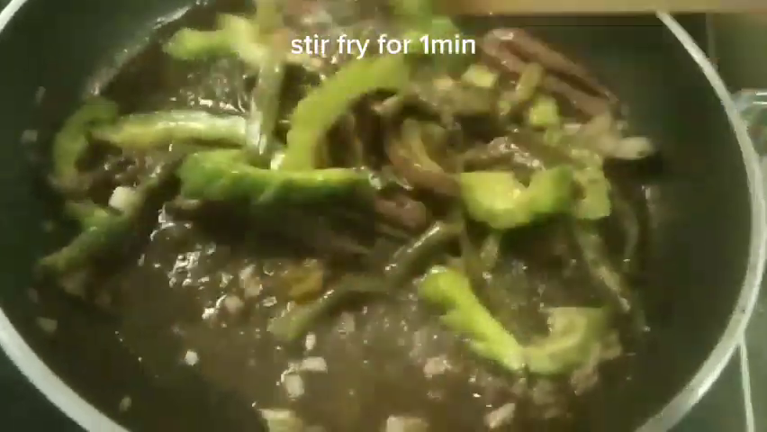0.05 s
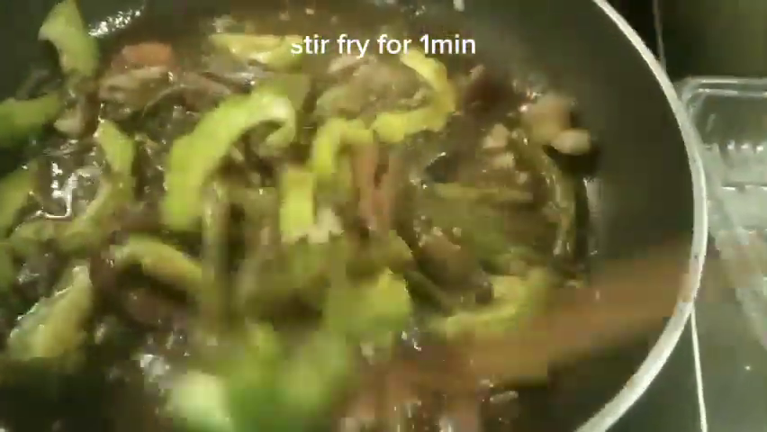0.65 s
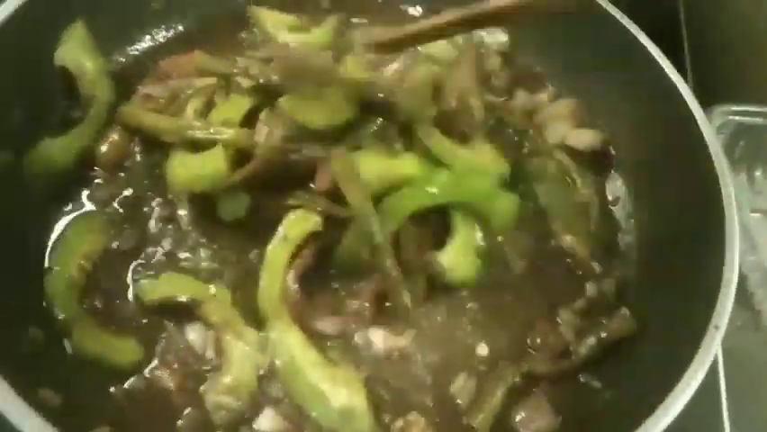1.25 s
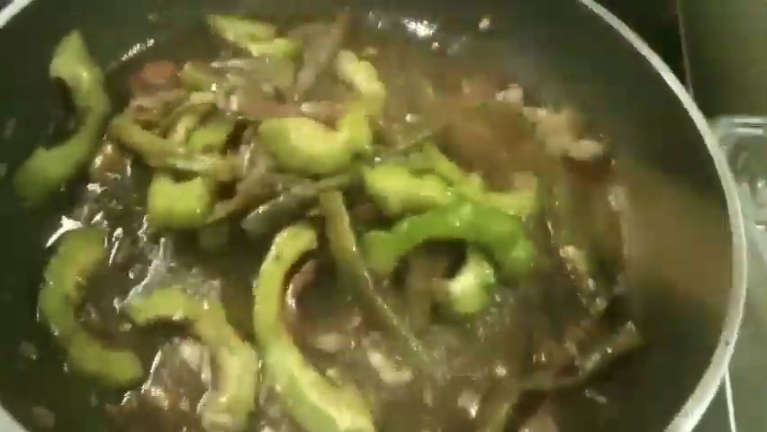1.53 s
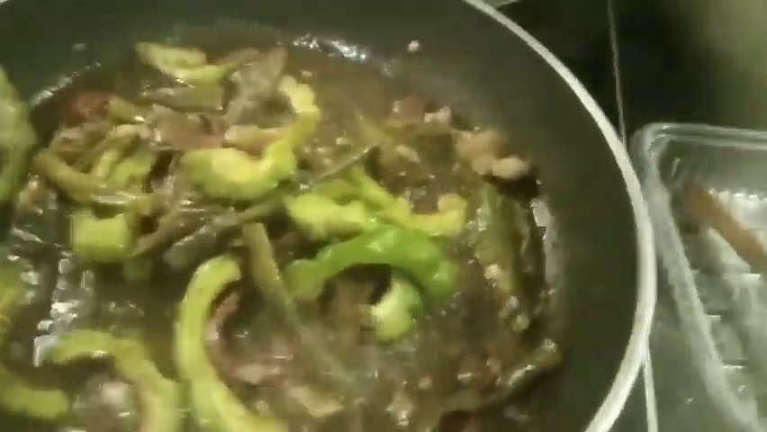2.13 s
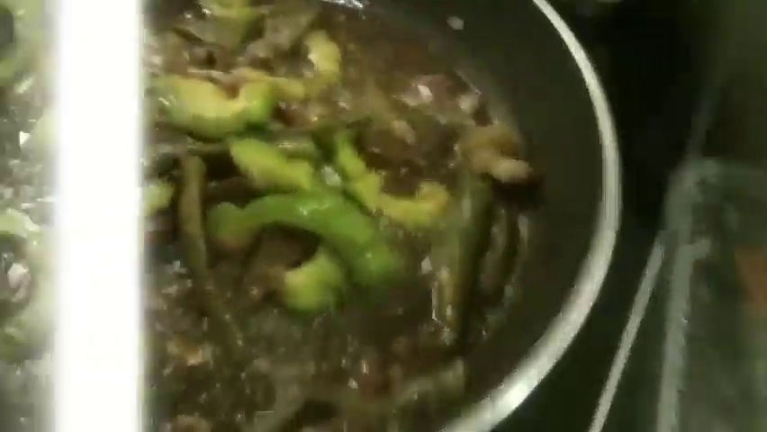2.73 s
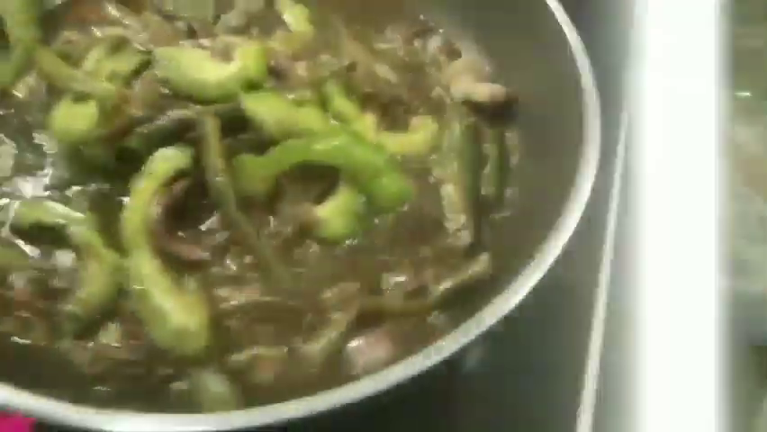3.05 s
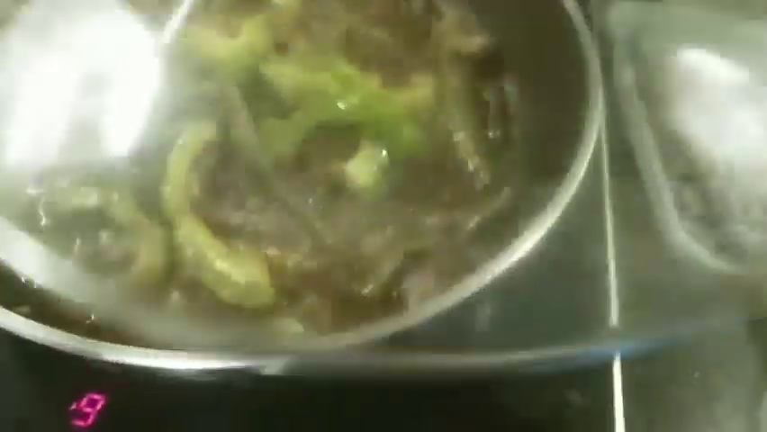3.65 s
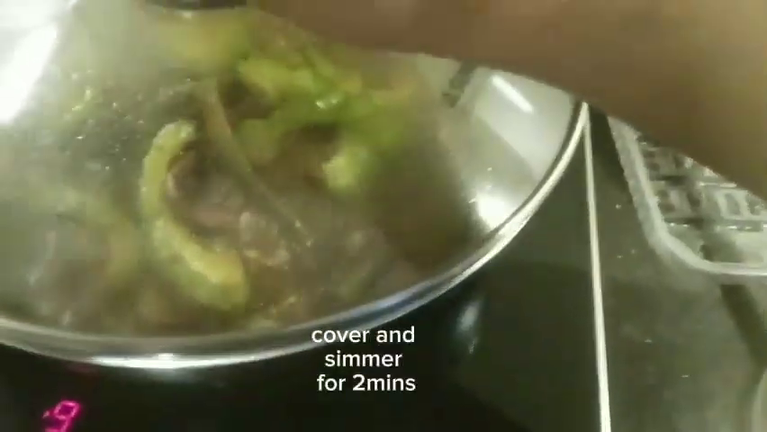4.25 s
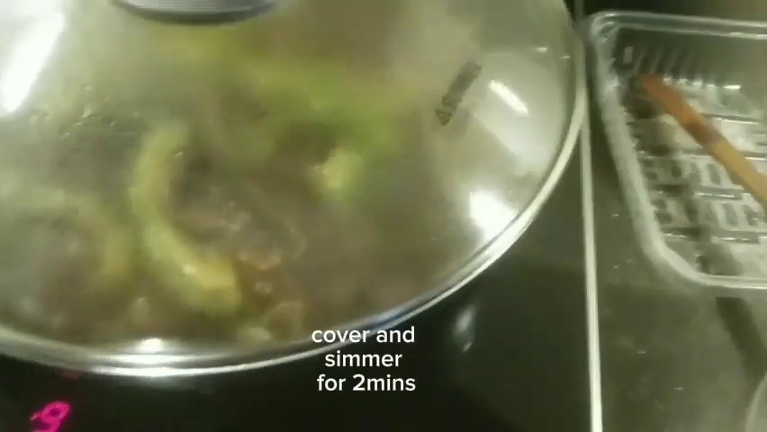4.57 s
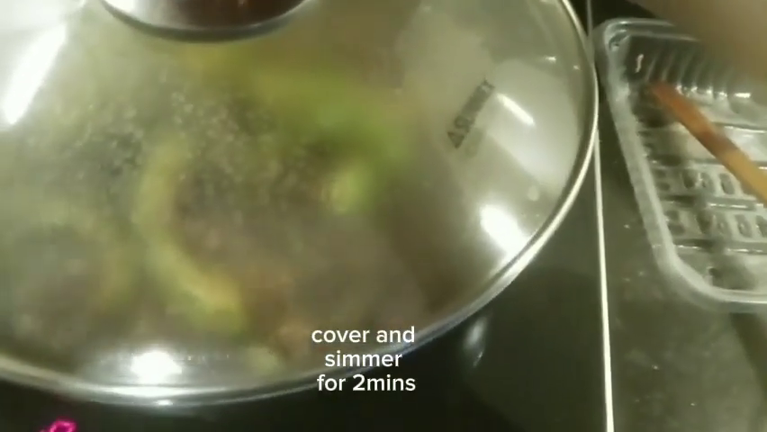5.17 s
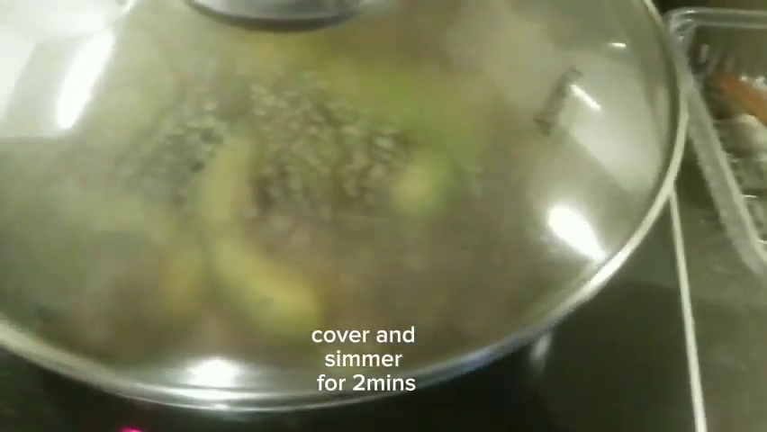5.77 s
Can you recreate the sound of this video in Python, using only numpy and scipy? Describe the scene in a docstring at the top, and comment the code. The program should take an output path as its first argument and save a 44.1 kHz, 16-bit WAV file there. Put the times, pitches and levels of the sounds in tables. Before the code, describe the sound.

Vegetables sizzle brightly in bubbling sauce, close to the microphone in a small kitchen with a low fan drone. A wooden spatula stirs softly and knocks on the pan a few times. The sizzle grows louder, with sharp spits of oil. A glass lid bumps as it is lifted, then clanks onto the rim and rings briefly. A dull thud shakes the worktop, and the sauce simmers on, quiet and muffled.

```python
"""A bright sizzle over a low fan drone: vegetables fry in sauce on an electric hob in a small kitchen.
Water flashes to steam, bubbles burst and oil spits; a wooden spatula stirs, taps the pan and is laid
aside. A hand rubs near the microphone as it moves to the hob's edge. A glass lid is picked up, clanks
onto the rim and shuts the sizzle in; a dull thud rings the worktop and the sauce simmers on."""
import sys
import numpy as np
from scipy import signal
from scipy.fft import rfft, irfft, next_fast_len
from scipy.io import wavfile
from scipy.ndimage import uniform_filter1d, map_coordinates

SR = 44100
rng = np.random.default_rng(int(sys.argv[2]) if len(sys.argv) > 2 else 0)


def to_wav(s):
    """Save 16-bit WAV."""
    ch = np.atleast_2d(s).T  # columns
    pcm = np.round(np.clip(ch, -1, 1) * 32767)  # PCM
    wavfile.write(sys.argv[1], SR, pcm.astype(np.int16))


N = 264819
T = np.arange(N) / SR

# how hard the open pan fries: time_s, level_db
VIGOUR = [(0.0, -50), (0.29, -48), (1.64, -49), (2.08, -46.5), (2.53, -41.5), (3.13, -41), (3.67, -44),
          (3.77, -46)]


def from_db(db):
    """Decibels to gain."""
    return 10 ** (np.asarray(db) / 20)


def rms_one(x):
    """Scale to rms 1."""
    return x / np.sqrt(np.mean(x ** 2) + 1e-20)


def steady(x, size):
    """Even out the level of a noise over a window of size samples; rms about 1."""
    return x / np.sqrt(uniform_filter1d(x ** 2, size=size) + 1e-12)


def in_time(rows):
    """Read a breakpoint curve at every sample."""
    return np.interp(T, *np.transpose(rows))


def at_hz(points, hz):
    """Read a table on a log-frequency axis."""
    table_hz, value = np.transpose(points)
    return np.interp(np.log(hz + 1), np.log(table_hz), value)


def add(out, start_s, x):
    """Mix x into out from start_s on."""
    at = int(start_s * SR)
    out[at:at + len(x)] += x[:N - at]


def colour(x, spectrum):
    """Minimum-phase EQ of unit power gain, falling steeply beyond the table's ends."""
    size = 2 * next_fast_len(N // 2 + SR // 4)
    hz = np.arange(size // 2 + 1) * SR / size
    octaves_outside = np.abs(np.log2((hz + 1) / np.clip(hz + 1, spectrum[0][0], spectrum[-1][0])))
    gain = rms_one(from_db(at_hz(spectrum, hz) - 30 * np.minimum(octaves_outside, 2)))
    cepstrum = irfft(np.log(gain))
    cepstrum[1:size // 2] *= 2  # folding the cepstrum makes the filter causal
    cepstrum[size // 2 + 1:] = 0
    return irfft(rfft(x, size) * np.exp(rfft(cepstrum)))[:N]


def low_pass(x, hz):
    """Gentle one-pole low-pass."""
    return signal.lfilter(*signal.butter(1, hz, fs=SR), x)


def even_spectrum(x):
    """Smooth out the chance peaks and holes in the spectrum of a short burst."""
    spectrum = rfft(x)
    power = np.abs(uniform_filter1d(np.abs(spectrum) ** 2, size=24))
    return irfft(spectrum / np.sqrt(power + 1e-12), len(x))


def ring(clicks, hz, t60):
    """A resonator: a unit click sets a sine of height 1 ringing."""
    radius, angle = from_db(-60 / (t60 * SR)), 2 * np.pi * hz / SR
    return signal.lfilter([0, np.sin(angle)], [1, -2 * radius * np.cos(angle), radius ** 2], clicks + 1e-18)


def grains(per_s, spread_db):
    """Random clicks whose levels scatter by spread_db; rms 1."""
    sizes = from_db(spread_db * np.minimum(rng.exponential(1, N), 6))
    return rms_one((rng.random(N) < per_s / SR) * sizes * rng.choice([-1, 1], N))


def flicker(x, depth_db, patch_s, patch_hz, rise_hz_per_s=0):
    """Patches of the spectrum swell and fade at random and may glide upwards; rms 1."""
    hz, s, cells = signal.stft(x, SR, nperseg=1024)
    field = rng.standard_normal(size=(600, 300))
    hz, s = np.meshgrid(hz, s, indexing="ij")
    position = [(hz - rise_hz_per_s * s) / patch_hz, s / patch_s]
    swell = map_coordinates(field, position, order=2, mode="wrap")
    cells = cells * from_db(depth_db * np.tanh(swell - .5))
    return rms_one(signal.istft(cells, SR)[1][:N])


def strokes(rows, attack_s, release_s):
    """Pressure envelope of a series of strokes: each swells to its peak and dies away."""
    pressure = np.zeros(N)
    for peak_s, db in rows:
        before, after = np.minimum(T - peak_s, 0), np.maximum(T - peak_s, 0)
        pressure += from_db(db) * np.exp(-(before / attack_s) ** 2 - after / release_s)
    return pressure


def nearness(start_s=2.33, end_s=2.87):
    """How far the microphone has moved to the hob's edge, 0-1."""
    return np.clip((T - start_s) / (end_s - start_s), 0, 1)


def kitchen(x, wet_db):
    """Direct sound plus a small room's diffuse tail, each band dying at its own rate."""
    # reverb time: freq_hz, t60_s
    room_decay = [(100, 0.23), (500, 0.32), (2000, 0.37), (6000, 0.4), (14000, 0.26)]
    t, tail = T[:SR * 2 // 3], 0
    edges_hz = np.geomspace(50, 16000, 9)
    for low, high in zip(edges_hz, edges_hz[1:]):
        band_pass = signal.butter(2, [low, high], "band", fs=SR, output="sos")
        band = signal.sosfilt(band_pass, rng.standard_normal(len(t)))
        tail = tail + band * from_db(-60 * t / at_hz(room_decay, np.sqrt(low * high)))
    tail = tail * (1 - np.exp(-t / 0.0024))  # reflections build up
    return x + from_db(wet_db) * signal.fftconvolve(x, tail / np.linalg.norm(tail))[:N]


def sizzle():
    """Water flashes to steam in thousands of tiny bursts; larger drops ring in the pan's hollow."""
    # bright steam hiss: freq_hz, gain_db
    steam_eq = [(2940, -51), (5000, -19), (6290, -3), (7380, 3), (7860, 4.5), (8840, -3.5), (11900, -16),
                (14100, -27), (16000, -63)]
    # resonances of the pan's hollow: pitch_hz, level_db, t60_s
    hollow_modes = [(2580, -2, 0.022), (2927, 5.5, 0.056), (3240, -12, 0.035), (3700, -8.5, 0.015),
                    (4680, 7, 0.027), (5110, 9.5, 0.012), (5700, 11.5, 0.012), (5900, 4, 0.024),
                    (6300, 6, 0.023)]
    bursts = colour(grains(per_s=20000, spread_db=3.5), steam_eq)
    bursts = signal.sosfilt(signal.butter(2, 5200, "high", fs=SR, output="sos"), bursts)
    hiss = flicker(bursts, depth_db=3.5, patch_s=.035, patch_hz=136)
    crackle = sum(from_db(db) * rms_one(ring(grains(per_s=5100, spread_db=4), hz, t60))
                  for hz, db, t60 in hollow_modes)
    crackle = flicker(crackle, depth_db=9, patch_s=.028, patch_hz=150)
    return from_db(in_time(VIGOUR)) * (from_db(-0.5) * hiss + from_db(-12.5) * crackle)


def bubble(hz, swell_s, rise_per_s=0.58):
    """A tone that swells, rings and dies, climbing in pitch like a bubble nearing the surface."""
    t = T[:int(7 * swell_s * SR)]
    envelope = t / swell_s * np.exp(1 - t / swell_s)
    return envelope * np.sin(2 * np.pi * hz * (t + rise_per_s * t ** 2 / 2))


def bubbling(count, low_hz, high_hz, swell_s, spread_db):
    """Bubbles at random moments and pitches, many quiet and a few loud; rms 1."""
    out = np.zeros(N)
    for when, pitch, size, life in rng.random((count, 4)):
        pop = bubble(low_hz + (high_hz - low_hz) * pitch, swell_s * (.5 + life))
        add(out, when * T[-1], from_db(spread_db * size ** 2) * pop)
    return rms_one(out)


def boiling_sauce():
    """In the open pan the sauce boils in a dense wet crackle that follows the frying."""
    # the boil from above the pan: freq_hz, gain_db
    above_eq = [(280, -70), (480, -18.5), (616, -7.5), (707, -24.5), (800, -6), (900, 1), (968, -6.5),
                (1080, -29.5), (1200, -8.5), (1280, -17.5), (1390, -2.5), (1510, -6), (1680, -21),
                (1900, -11.5), (2180, -14), (2600, -21), (3300, -20), (4290, -27), (7260, -120)]
    # the boil from the hob's edge: freq_hz, gain_db
    edge_eq = [(280, -33), (470, -19), (595, 2), (690, -21), (860, 3), (1040, -27), (1210, -1.5),
               (1420, -4), (1720, -17), (1920, -6), (2100, -14), (2270, -10), (2750, -24), (3200, -13),
               (3600, -26), (4290, -27), (7260, -120)]
    bubbles = bubbling(count=6000, low_hz=503.4, high_hz=4260, swell_s=0.004, spread_db=8.5)
    ticks = from_db(3) * grains(per_s=2000, spread_db=1)
    boil = flicker(bubbles + ticks, depth_db=6.5, patch_s=.032, patch_hz=130)
    above = np.sqrt(1 - nearness()) * rms_one(colour(boil, above_eq))
    edge = np.sqrt(nearness()) * rms_one(colour(boil, edge_eq))
    vigour_db = in_time(VIGOUR)
    level_db = -52 + 0.33 * (vigour_db - vigour_db.mean())  # a third of the sizzle's swing
    return from_db(level_db) * (above + edge)


def fan():
    """Moving air drones in low, wavering resonances, deeper at the hob's edge."""
    # the drone from above the pan: freq_hz, gain_db
    above_eq = [(18, -76), (30, -20), (77, -10), (97, -11), (129, 8), (192, -18.5), (266, -7.5), (376, -22),
                (432, -27), (480, -37), (620, -55), (1060, -120)]
    # the drone from the hob's edge: freq_hz, gain_db
    edge_eq = [(30, -5), (43, -24), (62, -15), (83, -4), (107, 2.5), (128, 0.5), (161, -17), (199, -25.5),
               (269, -11.5), (368, -29.5), (480, -35), (620, -87)]
    air = flicker(rng.standard_normal(N), depth_db=8, patch_s=.05, patch_hz=82)
    above = from_db(-51.5) * steady(colour(air, above_eq), size=SR // 10)
    edge = from_db(-47) * steady(colour(air, edge_eq), size=SR // 8)
    near = nearness()
    return (1 - near) * above + near * edge


def room_tone():
    """The faint, steady hiss of the kitchen."""
    # tone of the hiss: freq_hz, gain_db
    hiss_eq = [(240, 2), (400, -16), (507, -25), (770, 20), (977, 1.5), (1440, 5), (2500, -21), (3600, -10),
               (5500, -16), (7170, -17), (14000, -20)]
    return from_db(-66.5) * colour(rng.standard_normal(N), hiss_eq)


def blips_and_hoot(roughness=0.48):
    """Large bubbles burble in the sauce; a soft hollow hoot comes as the lid is carried over the pan."""
    # bubble blips and, at 3.455 s, the lid's hoot: start_s, level_db, pitch_hz, swell_s
    soft_tones = [(0.064, -45.5, 297, 0.0089), (0.328, -49.5, 317, .009), (3.455, -45, 591, 0.031),
                  (4.622, -54, 1360, 0.0063), (4.676, -56, 1650, 0.014), (4.868, -45, 2070, 0.0058),
                  (4.901, -48, 1622, 0.0074), (5.04, -50, 2030, .008), (5.196, -42.5, 256, 0.013),
                  (5.298, -52, 1785, 0.016), (5.355, -49, 2214, 0.011), (5.468, -52, 1690, 0.006),
                  (5.48, -43.5, 290, 0.0099), (5.594, -43, 273, 0.013), (5.625, -45, 1285, 0.0087),
                  (5.801, -39.5, 273, .013), (5.82, -52, 2840, 0.0085)]
    out = np.zeros(N)
    for start_s, db, hz, swell_s in soft_tones:
        add(out, start_s, from_db(db) * bubble(hz, swell_s))
    slow_noise = low_pass(low_pass(rng.standard_normal(N), hz=59), hz=59)
    flutter = np.sqrt(1 - roughness) + np.sqrt(roughness) * steady(slow_noise, size=SR // 25)
    return kitchen(out * flutter, wet_db=-7.5)


def stirring():
    """Pieces of food tumble softly against the pan at each shove of the spatula."""
    # shoves across the pan: peak_s, level_db
    shoves = [(0.115, -42), (0.48, -50), (0.745, -39.5), (1.13, -45), (1.31, -54), (1.485, -44)]
    # soft, low push on the pan: freq_hz, gain_db
    shove_eq = [(70, -12), (135, 12), (190, -22), (270, -8.5), (380, -32), (600, -38)]
    tumble = steady(colour(grains(per_s=820, spread_db=2), shove_eq), size=SR // 30)
    return strokes(shoves, attack_s=0.024, release_s=0.067) * tumble


def spits(decay_s=0.0051):
    """Single drops burst in the hot oil with a brief fizz."""
    # bursting drops: start_s, level_db
    drops = [(0.14, -29.5), (0.552, -27.5), (0.7233, -34), (1.356, -36), (2.2092, -30), (2.4157, -22),
             (2.662, -22), (2.814, -41), (3.4997, -24.5), (3.6227, -27)]
    # sharp fizz: freq_hz, gain_db
    fizz_eq = [(1200, -26), (3000, -23), (8000, -3), (12000, -15), (15000, -39)]
    fizz, t = np.zeros(N), T[:SR // 25]
    for start_s, db in drops:
        burst = rng.standard_normal(len(t)) * np.exp(-t / decay_s)
        add(fizz, start_s + 0.0025, from_db(db - 12.5) * burst)
    return kitchen(colour(fizz, fizz_eq), wet_db=-11.5)


def contacts(hits, scrape, slide_s=0.063):
    """Force of each hit: a click plus a burst of micro-slips that grows with the contact time."""
    out, t = np.zeros(N), T[:SR // 6]
    for start_s, db, bass_db, treble_db, contact_s, *_ in hits:
        envelope = np.exp(-t / contact_s) * (t / contact_s) ** (contact_s / 0.011)
        slips = even_spectrum(rng.standard_normal(len(t)) * envelope)
        slips *= np.exp(-(t / slide_s) ** 4)  # the slide comes to rest
        force = scrape * contact_s / 0.0025 * slips / np.linalg.norm(slips)
        force[0] += 1  # the click
        force /= np.linalg.norm(force)
        force += (from_db(bass_db) - 1) * low_pass(force, hz=250)  # weight
        force += (from_db(treble_db) - 1) * (force - low_pass(force, hz=4600))  # hardness
        add(out, start_s, from_db(db) * force)
    return out


def spatula_taps():
    """Wood knocks on the pan: a dense, quickly damped body and a few lasting modes."""
    # taps on pan and tray: start_s, level_db, bass_db, treble_db, contact_s
    taps = [(1.222, -38, 4, 2.5, 0.012), (1.653, -27, 5.5, -5, 0.0096), (1.703, -46, 12, 12.5, 0.0052),
            (1.722, -30, 11.5, -22, 0.013), (1.7375, -29, 12.5, -11, 0.002), (1.99, -41, 5, -17, 0.013),
            (2.078, -41.5, -28, 16, 0.014)]
    # woody body of a tap: freq_hz, gain_db
    body_eq = [(120, -28), (200, -24), (453, 4), (772, -24.5), (900, -10), (1060, -19), (1400, 4),
               (1750, -10), (2180, 0.5), (2450, -3), (2800, 3), (3200, -10.5), (3600, -9.5), (5100, -8.5),
               (5650, -6), (8210, -6.5), (14000, -38)]
    # ring of the pan: pitch_hz, level_db, t60_s
    pan_modes = [(407, 0, 0.1), (570, 7.5, 0.024), (1405, 5, 0.1), (2820, 7.5, 0.085), (3590, -1.5, 0.045),
                 (5350, 3, 0.045)]
    force = contacts(taps, scrape=2.7)
    ringing = sum((-1) ** k * from_db(db) * ring(force, hz, t60)
                  for k, (hz, db, t60) in enumerate(pan_modes))
    return from_db(26.5) * colour(force, body_eq) + from_db(-11) * ringing


def waver(rumble, half_width_s=0.069):
    """The low rumble wavers, briefly louder here and there."""
    # louder moments: peak_s, boost_db
    lifts = [(2.26, 8), (3.06, 6), (4.22, 9), (4.83, 4.5), (4.98, 4), (5.43, 3.5), (5.699, 7.5),
             (5.99, 3.5)]
    return rumble * from_db(sum(db * np.exp(-((T - peak_s) / half_width_s) ** 2) for peak_s, db in lifts))


def hand_rub():
    """Skin slips in fine grains on the casing beside the microphone."""
    # strokes of the hand: peak_s, level_db
    rubs = [(2.44, -41), (2.72, -58), (3.08, -52)]
    # tone of the rubbed casing: freq_hz, gain_db
    casing_eq = [(120, -26), (200, -15), (269, -1), (400, -16), (490, -22), (571, -9), (666, -11),
                 (908, -10), (1010, -16), (1250, -3), (1580, -12.5), (1780, -23), (1970, -24), (2800, -31),
                 (3640, -52), (6160, -120)]
    slips = colour(grains(per_s=3900, spread_db=-1), casing_eq)
    friction = flicker(slips, depth_db=7, patch_s=0.061, patch_hz=89.3)
    return strokes(rubs, attack_s=0.14, release_s=0.19) * friction


def clunks(hits, clunk_cycles=0.96, boom_hz=93.3, boom_cycles=0.81):
    """At each blow the struck thing flexes for a few cycles and its support gives with a low boom."""
    out, t = np.zeros(N), T[:SR // 6]
    for start_s, *_, clunk_db, clunk_hz, boom_db in hits:
        for db, hz, cycles in (clunk_db, clunk_hz, clunk_cycles), (boom_db, boom_hz, boom_cycles):
            age = t * hz / cycles  # 1 at the widest swing
            add(out, start_s, from_db(db) * age * np.exp(1 - age) * np.sin(2 * np.pi * hz * t))
    return out


def lid_pickup():
    """The glass lid bumps on its stand, damped by the hand that lifts it."""
    # bumps: start_s, level_db, bass_db, treble_db, contact_s, clunk_db, clunk_hz, boom_db
    bumps = [(3.213, -38.5, -9, -7, 0.0053, -50, 500, -57), (3.2255, -25.5, -14, 8, 0.0067, -21, 597, -50),
             (3.2485, -21.5, -5.5, 4, 0.0038, -18, 580, -45),
             (3.2975, -19.5, -19, -1, 0.0046, -22, 297, -54)]
    # hand-damped glass: freq_hz, gain_db
    held_eq = [(59, -35), (100, 8), (168, -0.5), (254, -4), (293, 1.5), (568, -4), (933, -9.5), (1100, -4),
               (1300, -10.5), (1730, -15), (2570, -18.5), (2970, -13.5), (4400, -26), (7850, -16.5),
               (14000, -53)]
    body = from_db(22.5) * colour(contacts(bumps, scrape=0.82), held_eq)
    return kitchen(body + clunks(bumps), wet_db=-13)


def lid_wobbles(sag_per_s=3.5):
    """The rocking dome pumps the air under it: hollow thuds that sink in pitch as the gap closes."""
    # rocks of the lid: start_s, level_db, pitch_hz, length_s
    rocks = [(3.253, -40, 540, 0.044), (3.31, -38, 407, 0.027), (3.737, -46, 327, 0.029),
             (3.801, -34.5, 616, 0.05), (3.873, -39.5, 558, 0.063), (3.958, -29, 496, 0.02),
             (4.016, -26.5, 413, 0.028), (4.094, -32, 398, 0.033), (4.272, -36.5, 380, 0.049)]
    # air under the dome: pitch_ratio, level_db
    air_modes = [(.6, -1), (.8, 2.5), (1, 5), (1.265, -6)]
    out, t = np.zeros(N), T[:SR // 4]
    slowing_time = (1 - np.exp(-sag_per_s * t)) / sag_per_s
    for start_s, db, hz, length_s in rocks:
        push = rng.standard_normal(len(t)) * np.exp(-(t / length_s) ** 2)
        hoot = sum((-1) ** k * from_db(mode_db) * ring(push, hz * ratio, t60=0.028)
                   for k, (ratio, mode_db) in enumerate(air_modes))
        hoot = np.interp(slowing_time, t, hoot)
        add(out, start_s, from_db(db) * hoot * np.sqrt(length_s * SR) / np.linalg.norm(hoot))
    return kitchen(out, wet_db=-13)


def covered_sizzle():
    """A dull, muffled sizzle under the lid, with a fluttering, slightly rising shimmer."""
    # tone of the muffled sizzle: freq_hz, gain_db
    muffled_eq = [(1470, -44), (2500, -33), (2690, -21), (2900, -7), (3220, -37), (3480, -22), (4480, -21),
                  (4780, -5), (5050, -20), (5280, -4), (5500, -17), (6000, -13), (6380, -6), (6800, 3),
                  (7050, -12), (7300, 2.5), (7650, -12.5), (7900, -2), (8400, -8.5), (9200, -24),
                  (10500, -35), (11900, -34), (14000, -59)]
    # its envelope: time_s, level_db
    muffled_level = [(4.15, -56.5), (4.304, -55), (4.484, -63.5), (4.772, -62), (4.902, -59),
                     (5.406, -59.5), (6.0, -57.5)]
    bursts = colour(grains(per_s=4400, spread_db=1.5), muffled_eq)
    shimmer = flicker(bursts, depth_db=9, patch_s=.03, patch_hz=140, rise_hz_per_s=900)
    fluttering = flicker(shimmer, depth_db=4, patch_s=.06, patch_hz=1800)
    return from_db(in_time(muffled_level) + 1) * fluttering


def covered_simmer(rise_db_per_s=2.2):
    """Under the lid the sauce simmers in sparser bubbles, slowly louder with the trapped heat."""
    # hollow tone of the shut pan: freq_hz, gain_db
    shut_eq = [(280, -73), (500, -16), (590, 5.5), (690, -8.5), (780, 9), (950, -12), (1060, -15.5),
               (1220, -11), (1420, 5), (1600, -7), (1750, -4.5), (1950, -8.5), (2280, -2.5), (2550, -20),
               (2920, -11.5), (3400, -19.5), (4290, -24), (7260, -120)]
    bubbles = bubbling(count=2600, low_hz=500, high_hz=4300, swell_s=0.0051, spread_db=5.5)
    ticks = from_db(-3) * grains(per_s=2200, spread_db=2)
    simmer = flicker(bubbles + ticks, depth_db=7.5, patch_s=.032, patch_hz=150, rise_hz_per_s=600)
    level_db = -56 + rise_db_per_s * (T - 5.5)
    return from_db(level_db) * kitchen(rms_one(colour(simmer, shut_eq)), wet_db=-6)


def clang(hits, modes, ring_db, split_hz=21.8):
    """Each blow sets every mode ringing as three close partials that beat."""
    out, t = np.zeros(N), T[:SR // 2]
    for start_s, db, *_ in hits:
        for hz, mode_db, t60 in modes:
            decay = from_db(-60 * t / t60)
            cluster_hz = (hz + split_hz * (k + rng.random() - .5) for k in (-1, 0, 1))
            partials = decay * sum(np.sin(2 * np.pi * (f * t + rng.random())) for f in cluster_hz)
            partials *= np.linalg.norm(decay) / np.linalg.norm(partials)
            add(out, start_s, from_db(db + mode_db + ring_db) * partials)
    return out


def lid_clanks(flat_s=4.0):
    """The glass lid clanks onto the rim, ringing first tilted on one edge, then lying flat."""
    # knocks: start_s, level_db, bass_db, treble_db, contact_s, clunk_db, clunk_hz, boom_db
    knocks = [(3.796, -22.5, -20, 3.5, 0.0052, -20, 594, -42),
              (3.862, -19, 5, 0.5, 0.0023, -13.5, 568, -28), (3.959, -30.5, 2, -1, 0.0055, -29.5, 940, -31),
              (4.008, -17.5, 1.5, -28, 0.0033, -33, 231, -26),
              (4.021, -31.5, 1, -20, 0.0041, -27, 343, -26),
              (4.095, -37.5, 12, -20, 0.0073, -25.5, 226, -32)]
    # body of lid on rim: freq_hz, gain_db
    body_eq = [(56, -15.5), (92, 2.5), (173, -16.5), (255, -1.5), (383, -15.5), (576, -6.5), (740, -12.5),
               (1080, -13.5), (1420, -31), (1700, -24.5), (2050, -20.5), (2480, -24), (3000, -17.5),
               (3880, -27), (7880, -19), (16000, -52.5)]
    # ring with one edge touching: pitch_hz, level_db, t60_s
    tilted_modes = [(560, 3.5, .33), (848, -2, 0.31), (1124, -3.5, 0.33), (1480, -2.5, 0.24),
                    (2005, -9, 0.43), (2360, -24, .22), (2810, -11, 0.35), (3080, -7, 0.64),
                    (3640, -10, 0.21), (8000, -4, 0.12)]
    # ring on the whole rim: pitch_hz, level_db, t60_s
    seated_modes = [(785, -13, 0.75), (1090, -0.5, 0.25), (1530, -4.5, 0.23), (1628, -8, 0.35),
                    (1900, -12.5, .3), (2220, -12, 0.61), (2870, -7, 0.28), (3910, -8, 0.17),
                    (4870, -12, 0.26), (5593, -17, 0.26), (7400, -17, 0.76)]
    body = from_db(23.5) * colour(contacts(knocks, scrape=3.2), body_eq)
    tilted = clang([hit for hit in knocks if hit[0] < flat_s], tilted_modes, ring_db=-16.5)
    seated = clang([hit for hit in knocks if hit[0] >= flat_s], seated_modes, ring_db=-16)
    return kitchen(body, wet_db=-4.5) + kitchen(clunks(knocks), wet_db=-11) + tilted + seated


def worktop_thud():
    """Something heavy lands and rocks, setting the worktop ringing."""
    # blows: start_s, level_db, bass_db, treble_db, contact_s, clunk_db, clunk_hz, boom_db
    blows = [(4.3795, -18.5, 6.5, 4.5, 0.0066, -21, 237, -22),
             (4.3875, -22.5, 4.5, -17, 0.0047, -16, 465, -50),
             (4.4015, -24.5, -6, 5, 0.0034, -29, 630, -30)]
    # dull body of the thud: freq_hz, gain_db
    body_eq = [(29, -46), (50, -16), (100, -3.5), (170, -6.5), (292, 2.5), (380, -5), (627, -2), (876, -7),
               (1090, -7.5), (2220, -16.5), (2450, -35), (2900, -18), (3250, -29), (3480, -23), (3850, -45),
               (4200, -30), (4500, -37), (5400, -31), (7870, -28), (10500, -49), (13300, -68),
               (15000, -100)]
    # ring of the worktop: pitch_hz, level_db, t60_s
    worktop_modes = [(450, 3, 0.41), (593, 2.5, 0.66), (760, -6, 0.46), (1075, 0, 0.26), (1320, -9, .4),
                     (1454, -13, 0.69), (1663, -12, 0.27), (2810, -23, 0.31), (3420, -9, 0.22),
                     (4347, -7, 0.17), (4930, -13, .22), (5330, -17, .23), (5650, -18, .3)]
    body = from_db(26) * colour(contacts(blows, scrape=4), body_eq)
    ringing = clang(blows, worktop_modes, ring_db=-21.5)
    return kitchen(body, wet_db=-4) + kitchen(clunks(blows), wet_db=-11) + ringing


def scene():
    """Everything at one microphone; the closing lid crossfades the open pan into the covered one."""
    # how much of the pan the lid leaves open: time_s, open_share
    lid_gap = [(3.7, 1.0), (3.85, .7), (4.0, .45), (4.08, .15), (4.14, .03), (4.2, 0.0)]
    opening = in_time(lid_gap)
    open_pan = opening * (sizzle() + boiling_sauce())
    covered_pan = (1 - opening) * (covered_sizzle() + covered_simmer())
    pan = open_pan + covered_pan + blips_and_hoot() + spits()
    background = waver(fan()) + room_tone()
    handling = stirring() + spatula_taps() + hand_rub()
    lid = lid_pickup() + lid_wobbles() + lid_clanks()
    return (pan + background + handling + lid + worktop_thud())[None]


def record(dry):
    """The small microphone loses the deep bass; the top is cut steeply."""
    low_cut = signal.butter(2, 55, "high", fs=SR, output="sos")
    high_cut = signal.ellip(10, .1, 80, 15800, fs=SR, output="sos")
    return signal.sosfilt(high_cut, signal.sosfilt(low_cut, dry))


dry = scene()
out = record(dry)
to_wav(out)
```